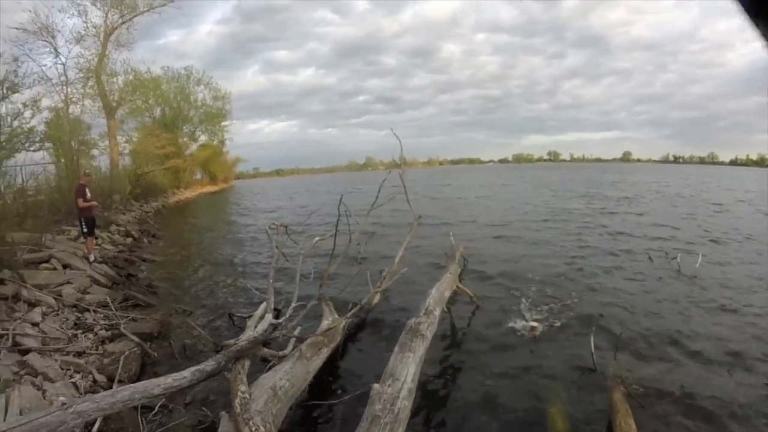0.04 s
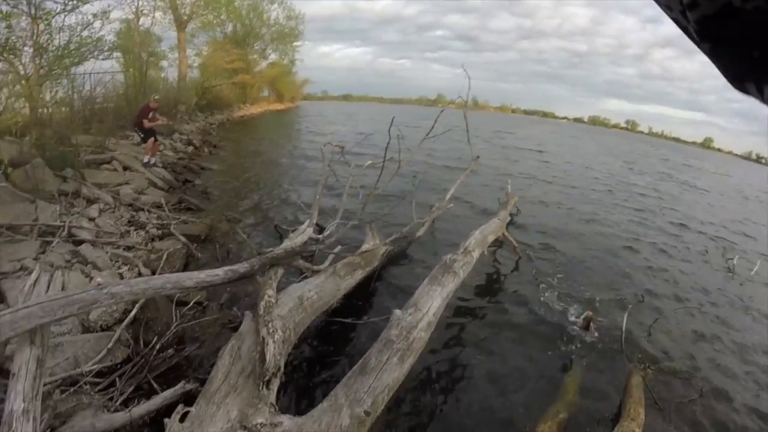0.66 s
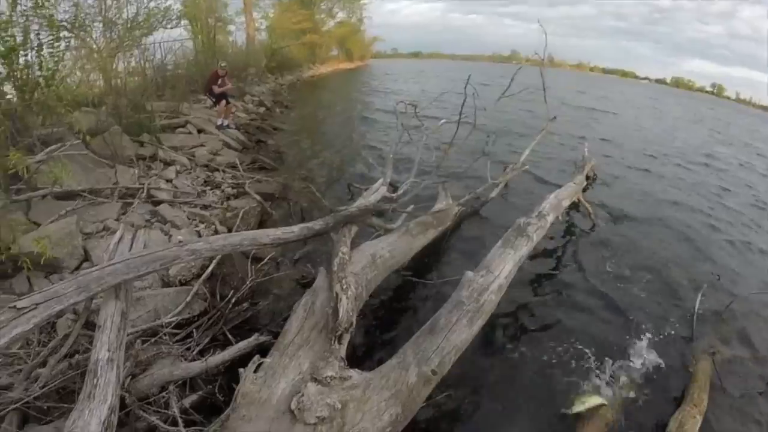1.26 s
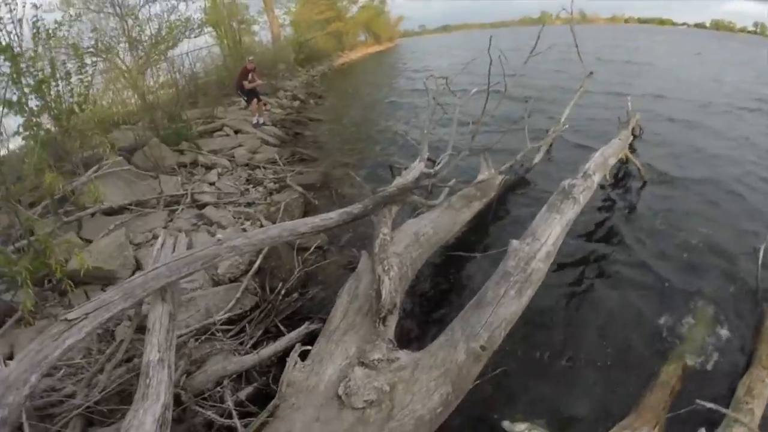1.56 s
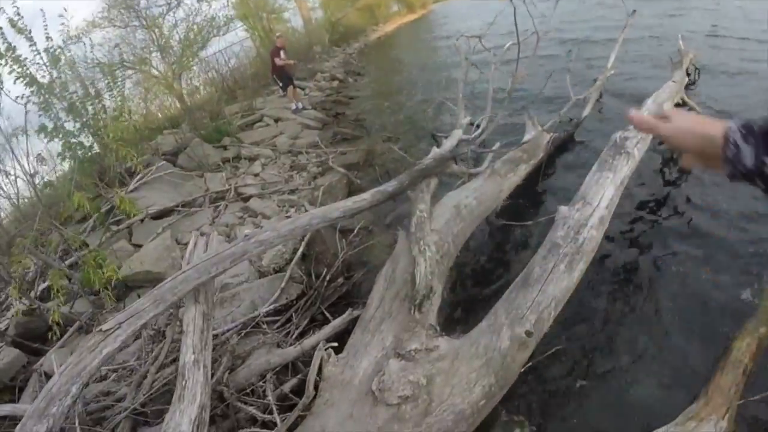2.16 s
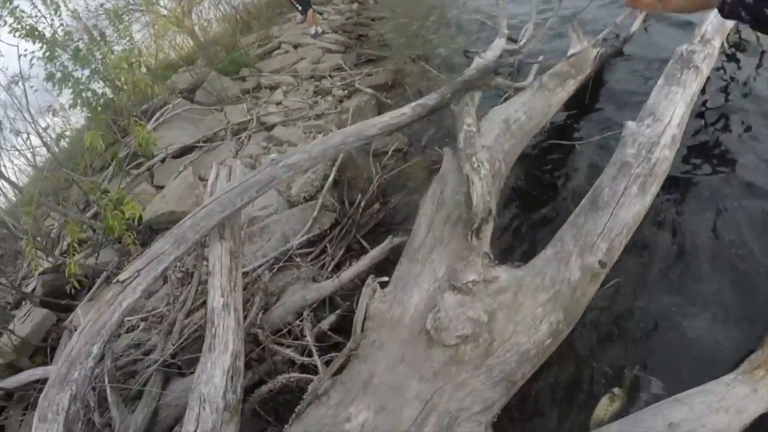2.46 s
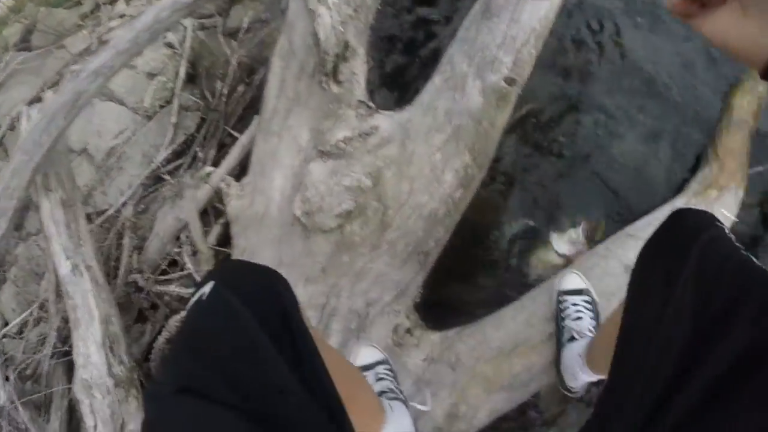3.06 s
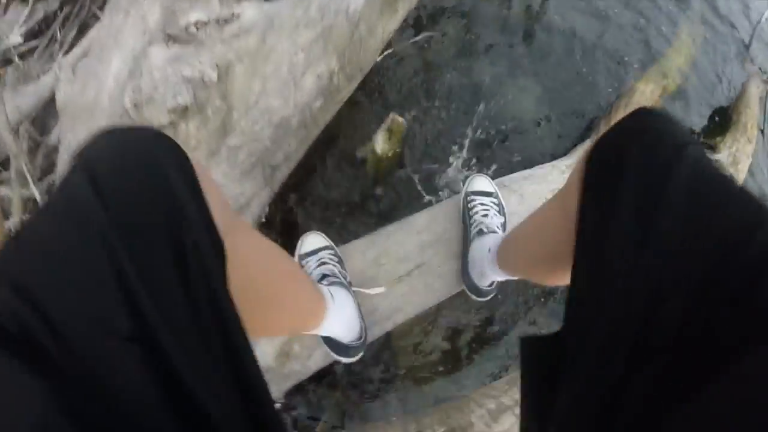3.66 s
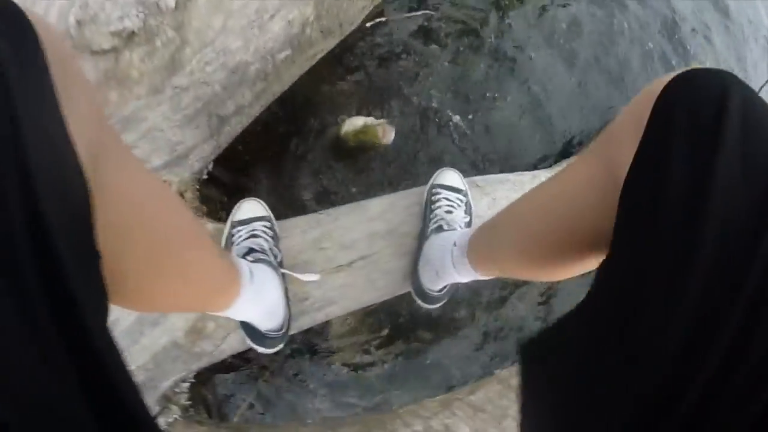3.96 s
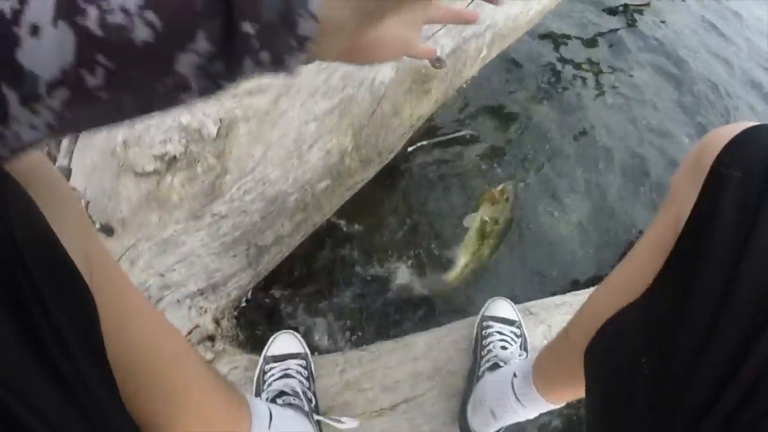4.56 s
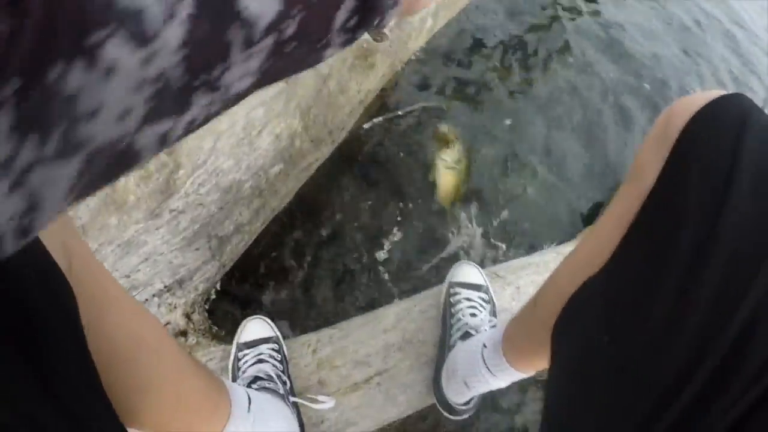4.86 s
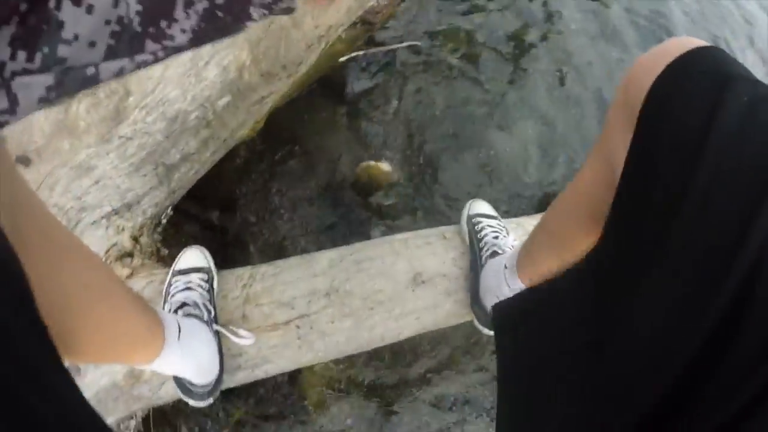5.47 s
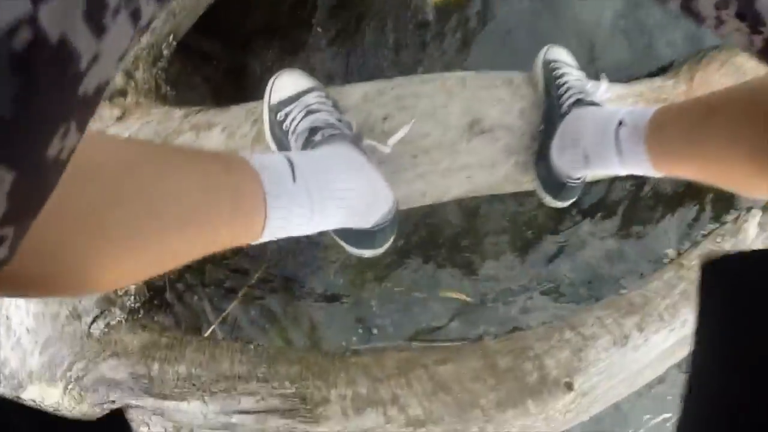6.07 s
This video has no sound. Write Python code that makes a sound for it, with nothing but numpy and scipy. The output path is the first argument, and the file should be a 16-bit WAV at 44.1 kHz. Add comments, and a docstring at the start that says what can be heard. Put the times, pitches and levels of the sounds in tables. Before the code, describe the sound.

A hooked fish thrashes at the surface of a lake, with sharp wet slaps, plopping bubbles and spray pattering back down. The sound cuts out briefly near the start. The splashes grow closer and busier in the second half, and a shaken lure clacks a few times. Small waves gurgle and hiss along the rocky shore, while gusts thump and rumble on a body-worn microphone, strongest toward the end.

```python
"""A hooked fish thrashing in a lake

The fish slaps the surface, spray patters back, bubbles ring and the shaken lure clacks.
Small waves gurgle and hiss along the shore. Gusts buffet a microphone worn by the angler,
a sleeve swishes past it and the taut line whistles faintly.
Early on, the sound cuts out for half a second."""
import sys
import numpy as np
from scipy import signal
from scipy.fft import rfft, irfft, next_fast_len
from scipy.io import wavfile
from scipy.ndimage import uniform_filter1d

SR = 44100
rng = np.random.default_rng(int(sys.argv[2]) if len(sys.argv) > 2 else 0)


def store_wav(level_fs):
    """Save 16-bit WAV to argv[1]."""
    pcm = np.round(np.clip(np.atleast_2d(level_fs), -1, 1) * 32767)
    wavfile.write(sys.argv[1], SR, pcm.T.astype(np.int16))


N = 278712
TIME = np.arange(N) / SR
CLOCK = np.arange(0, N / SR, .001)  # one step a millisecond, for slow changes

# bouts of thrashing: (start [s], length [s], churning water [dB], falling spray [dB])
THRASHES = [(1.091, 0.11, -31, -36.5), (1.326, 0.063, -36.5, -39), (1.51, 0.056, -44, -50),
            (3.164, 0.068, -48, -37), (3.289, 0.026, -36.5, -30.5), (3.401, 0.021, -42, -29.5),
            (3.515, 0.023, -34.5, -31.5), (3.64, 0.12, -50, -42), (3.835, 0.02, -37.5, -37),
            (4.02, 0.018, -34.5, -47.5), (4.19, 0.042, -50, -38), (4.28, 0.13, -30.5, -31),
            (4.436, 0.041, -26.5, -25), (4.594, 0.055, -34, -27.5), (4.818, 0.021, -36.5, -32),
            (4.948, 0.15, -50, -39), (5.28, 0.049, -58, -38.5), (5.417, 0.095, -38.5, -40.5),
            (6.201, 0.11, -44, -40.5)]
THRASH_RISE_S = 0.02


def slaps(hold_s=0.0053, rise_s=0.0017, fall_s=0.0051, tail_s=0.016):
    """Tail and body hit the lake: a sheet of water bursts into froth, then crumbles into droplets."""
    # hits: (time [s], level [dB], low gulp [dB], high fizz [dB]); the last two relative to the mids
    hits = [(0.9143, -23, 12, -15), (1.101, -23.5, 1, -10), (1.3375, -15, -6, 0), (1.581, -25, 0, 2),
            (1.66, -24, 0, 0), (2.2175, -29, -4, -8), (2.502, -24, 1, -2.5), (2.716, -20.5, 3, -7),
            (3.081, -25.5, -2.5, -10), (3.109, -24.5, 5, 9), (3.1835, -19.5, 3, -5), (3.2948, -24, -17, -3),
            (3.3091, -12, -8, -11), (3.396, -13.5, -21, -1.5), (3.431, -19.5, 6, -28),
            (3.544, -17.5, -5, -1), (3.553, -16.5, -25, -4.5), (3.6285, -20, -6, 1), (3.677, -21, 5, 2),
            (3.853, -23, -20, -18), (4.173, -25.5, -10, -5), (4.3066, -17.5, -24, 8), (4.315, -17, -15, -4),
            (4.374, -16.5, -31, -11), (4.4482, -8, -6, -0.5), (4.454, -8.5, 4, -3), (4.667, -16, -26, -12),
            (4.683, -19.5, -16, 1), (4.829, -10, -9, -3), (5.0664, -22, -12, -7), (5.268, -19.5, 15.5, -31),
            (5.289, -20.5, 8, -4), (5.404, -22.5, -8, -17), (5.53, -16.5, -7, -8), (5.822, -29, 5, -5),
            (6.228, -28.5, -1, 27)]
    froth = swarm(low_hz=593, high_hz=16300, per_s=2700, cycles=4.6, spread_db=7.0, pitches=50)
    froth += 0.65 * rng.standard_normal(N)
    t = np.arange(SR // 6) / SR
    body = np.exp(-np.maximum(t - hold_s, 0) / fall_s)
    shape = (body + amp(-15) * np.exp(-t / tail_s)) * (1 - np.exp(-t / rise_s))
    out = np.zeros(N)
    for start, db, gulp_db, fizz_db in hits:
        crackle = froth[int(rng.random() * (N - len(t))):][:len(t)]
        tone = [(120, gulp_db - 42), (450, gulp_db + 14), (1000, gulp_db + 2), (2000, 0), (3600, 0),
                (7500, fizz_db), (15000, fizz_db - 2.5)]
        burst = steadied(unit(colour(crackle, tone)), span_s=0.0014)
        add(out, start, amp(db - 6) * burst * shape)
    return out


def plops():
    """Single large bubbles ring; low ones last longest, and hard-driven ones break up sooner."""
    # bubbles: (time [s], level [dB], pitch [Hz])
    bubbles = [(.265, -26, 480), (.93, -22, 370), (.973, -29, 615), (.999, -21.5, 466), (1.066, -20, 414),
               (1.0998, 1, 395), (1.102, -18.5, 1570), (1.177, -15, 870), (1.344, -18, 475),
               (2.168, -24, 850), (2.214, -18, 1010), (2.341, -23.5, 665), (2.367, -23.5, 930),
               (2.662, -23.5, 850), (2.703, -18.5, 900), (3.176, -17.5, 677), (3.265, -21.5, 567),
               (3.353, -20, 2150), (3.374, -25, 1850), (3.433, -7.5, 253), (3.433, -17.5, 710),
               (3.516, -20, 1013), (3.545, -5, 402), (3.558, -14, 2910), (3.619, -23, 1700),
               (3.79, -22.5, 4200), (4.254, -15.5, 1180), (4.273, -21, 460), (4.391, -17, 1110),
               (4.452, -13, 1130), (4.614, -13, 1060), (4.673, -8.5, 3150), (4.769, -21.5, 1010),
               (4.813, -9.5, 560), (4.831, -10.5, 850), (4.834, -6, 2560), (4.933, -22.5, 4650),
               (5.376, -26, 1660), (5.396, -24.5, 1066), (5.41, -17, 3180), (6.195, -24, 2640),
               (6.207, -17, 600)]
    out = np.zeros(N)
    for start, db, hz in bubbles:
        ring_s = 0.045 / (1 + hz / 2100) * amp(0.47 * (-20 - db))
        add(out, start, amp(db) * bubble(hz, ring_s, glide=0.11))
    return out


def clacks(rattle_s=0.0061):
    """The shaken lure rings and rattles three times; the last hit is a bright, sharp slap on the water."""
    # hits: (time [s], level [dB], brightness [dB per octave])
    hits = [(3.1707, -14.5, 3), (4.012, -15, -0.5), (4.0614, -15.5, -0.5), (4.2554, -13.5, 9.5)]
    # a hit's ringing tones: (pitch [Hz], level [dB], time to fade by 60 dB [s])
    tones = [(877, -9.5, 0.059), (1113, -5.5, 0.038), (1386, -7, 0.044), (1840, 1, 0.0092),
             (2444, -1.5, 0.037), (2850, -3, 0.011), (3160, -2, 0.0052), (3330, 2, 0.0087),
             (3545, -6, 0.053), (4200, -1, 0.004), (5200, -6, 0.017), (7460, -26, .008)]
    t = np.arange(SR // 10) / SR
    out = np.zeros(N)
    for start, db, tilt in hits:
        ring = np.zeros(len(t))
        for hz, tone_db, ring_s in tones:
            fade = amp(tone_db + tilt * np.log2(hz / 3000) - 60 * t / ring_s)
            ring += fade * np.sin(2 * np.pi * (hz * rng.uniform(0.95, 1.03) * t + rng.random()))
        ring /= ring[:SR // 400].std()
        rattle_tone = [(400, -13), (1200, -7), (3500, 1), (7000, tilt - 17), (15000, tilt - 26)]
        rattle = unit(noise(rattle_tone, len(t))) * np.exp(-t / rattle_s)
        add(out, start, amp(db - 5) * (ring + 0.56 * rattle))
    return out


def churn():
    """Water folds over round the fish and among the rocks, and gurgles."""
    # tone of the gurgle: (frequency [Hz], level [dB])
    tone = [(150, 1.5), (350, 6), (560, 4.2), (760, 1), (1000, 3.4), (1300, -7), (1800, -2.5), (3000, -24),
            (8000, -56)]
    stirred = [amp(db) * surge(start, length, THRASH_RISE_S, fall_s=0.047)
               for start, length, db, _ in THRASHES]
    lapping = amp(-47)
    level = np.hypot(amp(total_db([lapping] + stirred)), amp(waves_db()))
    gurgle = swarm(low_hz=384.2, high_hz=1700, per_s=320, cycles=18.6, spread_db=6.5, pitches=40)
    gurgle += 1.25 * rng.standard_normal(N)
    return steadied(colour(gurgle, tone), span_s=0.068) * level * amp(-3.5)


def spray():
    """Thrown drops fall back with each bout of thrashing."""
    # tone of the spray: (frequency [Hz], level [dB])
    tone = [(300, 1), (1000, -3.5), (2000, -4.5), (3000, -2.5), (4000, -8), (5100, -6.5), (6800, -10),
            (10000, -10.5), (15500, -7)]
    thrown = [amp(db) * surge(start, length, THRASH_RISE_S, fall_s=0.065)
              for start, length, _, db in THRASHES]
    return patter(tone) * amp(total_db(thrown) + 2.4 * wander(rate_hz=110))


def patter(tone):
    """Drops on water: ticks, tiny ringing bubbles and a hiss that hides them from afar."""
    # the fish is reeled in: (time [s], nearness [0-1])
    nearness = [(0, 0.4), (2.7, 0.75), (3.3, 0.73), (5.4, 0.92), (5.8, 0.75)]
    ticks = swarm(low_hz=2400, high_hz=13200, per_s=900, cycles=5.1, spread_db=0.5, pitches=24)
    plinks = swarm(low_hz=1680, high_hz=8510, per_s=380, cycles=18, spread_db=5.5, pitches=70)
    drops = follow(nearness) ** 1.3 * (0.63 * ticks + 0.6 * plinks)
    shower = colour(drops + 0.8 * rng.standard_normal(N), tone)
    return steadied(sparkle(near_echoes(shower)), span_s=0.098)


def sparkle(x, patchy_db=2.0):
    """Drops land in clumps of like size, so the tone shifts from moment to moment."""
    spectra = signal.stft(x, nperseg=256)[2]
    patches = uniform_filter1d(rng.standard_normal(spectra.shape), size=7, axis=0)
    patches = unit(uniform_filter1d(patches, size=5, axis=1))
    return signal.istft(spectra * amp(patchy_db * patches), nperseg=256)[1][:len(x)]


def bubble(hz, ring_s, glide):
    """A trapped pocket of air rings, rising in pitch as it nears the surface."""
    t = np.arange(int(ring_s * SR) + 8) / SR
    ring = np.sin(2 * np.pi * hz * (t + glide * t ** 2 / (2 * ring_s)))
    return ring * amp(-60 * t / ring_s) * (1 - np.exp(-2 * hz * t))


def swarm(low_hz, high_hz, per_s, cycles, spread_db, pitches):
    """Many small bubbles of mixed pitch and strength ring at random moments."""
    out = np.zeros(N + SR)
    rings = [bubble(hz, cycles * rng.uniform(0.45, 3.5) / hz, glide=0.2) * hz / high_hz
             for hz in np.geomspace(low_hz, high_hz, pitches)]
    when, kind, faintness = rng.random((int(per_s * N / SR), 3)).T
    for k, ring in enumerate(rings):
        these = (kind * pitches).astype(int) == k
        samples = (when[these, None] * N).astype(int) + np.arange(len(ring))
        np.add.at(out, samples, ring * amp(-spread_db * np.log(faintness[these, None] + 1 / 20)))
    return unit(out[:N])


def wind(rise_s=0.014, fall_s=0.022):
    """Swirling air thumps the microphone over a rumble, and flutters more in hard gusts."""
    # surges: (start [s], length [s], deep thump [dB], low burble [dB])
    # all are gusts but the one at 1.082 s, a low gulp of water as the fish splashes
    surges = [(0.203, 0.014, -27.5, -60), (0.302, 0.034, -37, -59), (0.847, 0.017, -37, -62),
              (0.986, 0.027, -30.5, -64), (1.082, 0.016, -42, -30), (1.208, 0.078, -39, -69),
              (1.579, 0.021, -30, -27), (1.643, 0.096, -30.5, -25.5), (1.787, .19, -27, -34),
              (2.08, 0.034, -44, -40), (2.223, 0.017, -31, -48), (2.355, 0.033, -24.5, -32),
              (2.409, 0.18, -23, -33.5), (2.665, 0.087, -20, -27.5), (2.808, 0.048, -25.5, -23.5),
              (2.94, 0.045, -21.5, -29), (3.114, 0.017, -32, -39), (3.45, 0.035, -36, -58),
              (3.597, 0.063, -24.5, -37), (3.7, .1, -25.5, -32), (3.88, 0.018, -21, -41),
              (4.027, 0.071, -23.5, -39), (4.215, 0.014, -27, -60), (4.376, 0.082, -17, -31),
              (4.463, 0.17, -18.5, -22.5), (4.642, 0.024, -33, -23.5), (5.158, 0.029, -20, -36.5),
              (5.277, 0.22, -39.5, -47), (5.511, 0.046, -19.5, -19.5), (5.567, 0.18, -18.5, -15.5),
              (5.756, 0.092, -20.5, -22), (5.923, 0.0056, -30, -20.5), (6.0, 0.076, -19.5, -22.5),
              (6.12, .16, -22, -27)]
    # tones of the four layers: (frequency [Hz], level [dB])
    rumble_tone = [(10, -21), (22, -1.5), (40, 0.5), (70, -3.5), (140, -13.5), (300, -44), (1500, -78)]
    buffet_tone = [(10, -22), (22, -15), (45, -8), (82, 2), (105, -2.5), (150, -10), (220, -25.5),
                   (350, -36), (900, -51), (3000, -100)]
    flutter_tone = [(50, 17), (110, -10.5), (155, -0.5), (200, -7.5), (300, -20), (600, -52), (2000, -89)]
    burble_tone = [(40, -30), (120, 2), (190, 1.5), (260, -1), (360, -8), (470, -21), (600, -24),
                   (1270, -44), (3000, -46.5), (9000, -87)]
    thumps, burbles = [amp(-49.5)], [amp(-64)]  # the light breeze between gusts
    for start, length, deep_db, low_db in surges:
        shape = surge(start, length, rise_s, fall_s)
        thumps.append(shape * amp(deep_db))
        burbles.append(shape * amp(low_db))
    thump_db, burble_db = total_db(thumps), total_db(burbles)
    rumble = steadied(noise(rumble_tone), span_s=0.17)
    rumble *= amp(0.56 * thump_db + 4 * wander(rate_hz=12) - 18.5)
    buffet = steadied(noise(buffet_tone), span_s=0.0455)
    buffet *= amp(thump_db + 2.73 * wander(rate_hz=42) - 2)
    flutter = steadied(noise(flutter_tone), span_s=0.036)
    flutter *= amp(1.357 * thump_db + 4.8 * wander(rate_hz=45) + 1.6)
    burble = steadied(noise(burble_tone), span_s=0.033)
    burble *= amp(burble_db + 4.87 * wander(rate_hz=61) - 1.5)
    return rumble + buffet + flutter + burble


def wind_pops(rise_s=0.0012):
    """Single swirls of air burst on the microphone's opening and die in a dull flutter."""
    # bursts: (time [s], level [dB], fade time [s])
    bursts = [(1.622, -17.5, 0.0085), (1.971, -15, 0.01), (2.542, -13, 0.021), (2.797, -18, 0.01),
              (2.902, -11.5, 0.0084), (3.624, -19, 0.009), (3.675, -20, 0.0072), (3.878, -16.5, 0.01),
              (4.521, -20, 0.0067), (4.549, -9.5, 0.0074), (5.573, -12.5, 0.014), (5.715, -12.5, 0.035),
              (5.823, 0.5, 0.0018), (5.873, -8.5, 0.0043), (5.914, -12, 0.0085), (6.166, -4.5, 0.0057)]
    # tone of a burst: (frequency [Hz], level [dB])
    tone = [(50, -7), (150, 9), (300, 5.5), (500, -8), (800, -21.5), (1400, -36), (3000, -64), (9000, -86)]
    t = np.arange(SR // 8) / SR
    out = np.zeros(N)
    for start, db, fall_s in bursts:
        flutter = steadied(noise(tone, len(t)), span_s=0.0094)
        add(out, start, amp(db + 1) * flutter * np.exp(-t / fall_s) * (1 - np.exp(-t / rise_s)))
    return out


def sleeve():
    """An arm sweeps past: cloth and the air it pushes brush the microphone."""
    # tone of the swish: (frequency [Hz], level [dB])
    tone = [(120, -20), (280, 7), (450, 1), (620, -6.5), (900, -29), (2000, -44), (6000, -28), (15000, -34)]
    passing_db = total_db([surge(start_s=1.645, length_s=0.068, rise_s=0.0088, fall_s=0.022)])
    rub = steadied(noise(tone), span_s=0.057)
    return rub * amp(-25 + passing_db + 2.1 * wander(rate_hz=65))


def wash():
    """Wavelets break all along the shore: a soft, flickering hiss that swells with each wave."""
    # strength of the choppy lake's hiss: (time [s], level [dB])
    hiss_curve = [(0, -45.5), (.85, -44), (1.3, -40.5), (2.08, -42.5), (2.43, -46), (2.6, -40.5),
                  (2.95, -46), (3.5, -40.5), (4.1, -50.5), (4.9, -43), (5.8, -46), (6.32, -47)]
    # tone of that hiss: (frequency [Hz], level [dB])
    tone = [(300, 2), (1000, 0), (1900, -2.5), (3000, -3), (3900, -6), (5000, -5.5), (6500, -8.5),
            (10000, -9), (15500, -9.5)]
    level = np.hypot(amp(follow(hiss_curve)), amp(waves_db() - 11))
    return patter(tone) * level * amp(1.43 * wander(rate_hz=21) + 2.3 * wander(rate_hz=130) - 0.2)


def waves_db():
    """Level of the small waves as they run up the rocks."""
    # waves: (start [s], length [s], level [dB])
    waves = [(.25, 0.042, -44), (0.82, 0.025, -38), (1.886, 0.21, -38), (2.183, 0.031, -37.5),
             (2.319, 0.031, -34.5), (2.68, 0.031, -37), (5.562, 0.33, -40), (6.056, 0.072, -40)]
    return total_db([amp(db) * surge(start, length, rise_s=0.04, fall_s=0.047)
                     for start, length, db in waves])


def line_whistle():
    """Wind sheds tiny swirls off the taut line: a thin, wavering whistle."""
    hz = 2410 + 16 * wander(rate_hz=40.4)
    taut_db = total_db([surge(start_s=3.8, length_s=0.5, rise_s=0.035, fall_s=0.035)])
    return amp(-54 + taut_db + 2.4 * wander(rate_hz=30)) * np.sin(2 * np.pi * np.cumsum(hz) / SR)


def near_echoes(x, echo_db=-16):
    """The water's surface and the nearest logs repeat each drop within milliseconds."""
    out = x.copy()
    for delay_s in np.geomspace(0.0025, 0.018, 4):
        add(out, delay_s, amp(echo_db) * x)
    return unit(out)


def shore_echo(x, echo_db=-19, ring_s=0.12):
    """Logs and rocks scatter a faint, short echo."""
    t = np.arange(SR // 3) / SR
    tail = noise([(200, -0.5), (2500, -10), (12000, -21)], len(t)) * amp(-60 * t / ring_s) * (t > .005)
    return x + amp(echo_db) * signal.oaconvolve(x, tail / np.linalg.norm(tail))[:N]


def amp(db):
    """Turns decibels into a gain."""
    return 10 ** (np.asarray(db) / 20)


def unit(x):
    """Scales x to an average power of one."""
    return x / np.sqrt(np.mean(x ** 2) + 1e-20)


def follow(curve):
    """Joins (time, value) points with straight lines."""
    return np.interp(TIME, *np.transpose(curve))


def colour(x, tone):
    """Filters x by a curve of (frequency [Hz], level [dB]) points."""
    hz, db = np.transpose(tone)
    size = next_fast_len(len(x))
    bins = np.fft.rfftfreq(size, 1 / SR)
    gain = amp(np.interp(np.log(bins + 1), np.log(hz), db))
    return irfft(rfft(x, size) * gain, size)[:len(x)]


def noise(tone, samples=N):
    """Random noise with the given tone."""
    return colour(rng.standard_normal(samples), tone)


def wander(rate_hz):
    """A smooth random wobble, about one in size."""
    bins = np.fft.rfftfreq(len(CLOCK), CLOCK[1])
    slow = rfft(rng.standard_normal(len(CLOCK))) * np.exp(-(bins / rate_hz) ** 2)
    return np.interp(TIME, CLOCK, unit(irfft(slow, len(CLOCK))))


def steadied(x, span_s):
    """Evens out swells slower than span_s and keeps the fine grain."""
    power = abs(uniform_filter1d(x ** 2, max(int(span_s * SR), 8)))
    return x / np.sqrt(power + 0.0045 * np.mean(x ** 2))


def surge(start_s, length_s, rise_s, fall_s):
    """Swells up to its start, holds for its length, and dies away."""
    rising = np.minimum(CLOCK - start_s, 0) / rise_s
    falling = np.maximum(CLOCK - start_s - length_s, 0) / fall_s
    return np.exp(np.maximum(rising - falling, -20))


def total_db(surges):
    """Level, at every sample, of surges whose powers add."""
    return np.interp(TIME, CLOCK, 10 * np.log10(sum(part ** 2 for part in surges)))


def add(mix, start_s, sound):
    """Mixes a sound in at the given time."""
    part = mix[max(round(start_s * SR), 0):][:len(sound)]
    part += sound[:len(part)]


def scene():
    """The fish, the water round it and the wind, in one channel."""
    air = wind() + line_whistle() + sleeve()
    fish = slaps() + clacks() + plops()
    air += wind_pops()
    return (shore_echo(fish) + churn() + spray() + wash() + air)[None]


def record(dry, cut_start_s=0.333, cut_end_s=0.832, fade_s=0.028, ceiling=0.95, top_hz=15650):
    """Cuts out briefly to a trace of rumble, rounds off loud peaks and removes the highest treble."""
    live = np.clip(np.maximum(cut_start_s - TIME, TIME - cut_end_s) / fade_s, 0, 1)
    trace = amp(-55) * signal.sosfilt(signal.butter(4, 45, fs=SR, output="sos"), dry)
    heard = dry * live + trace * (1 - live)
    rounded = heard / (1 + (heard / ceiling) ** 4) ** (1 / 4)
    treble_cut = signal.firwin(401, top_hz, window=("kaiser", 8), fs=SR)
    return signal.oaconvolve(rounded, treble_cut[None], "same")


dry = scene()
out = record(dry)
store_wav(out)
```